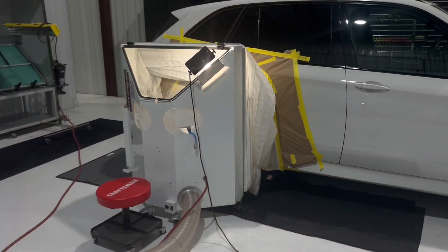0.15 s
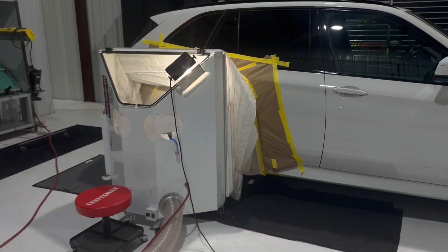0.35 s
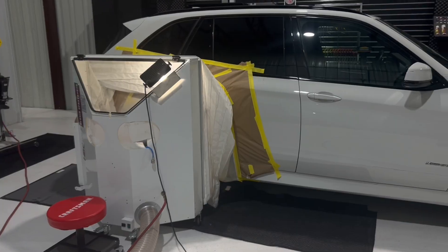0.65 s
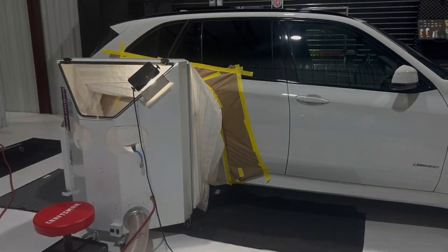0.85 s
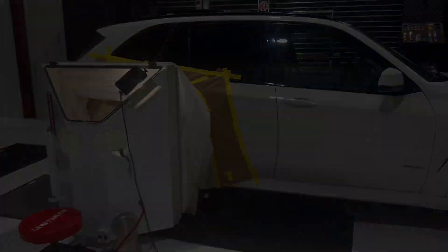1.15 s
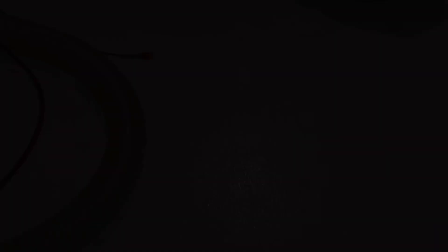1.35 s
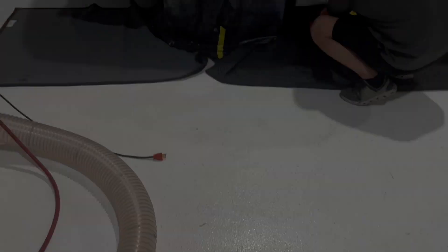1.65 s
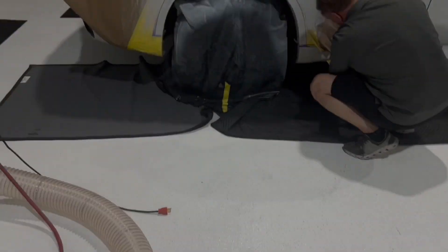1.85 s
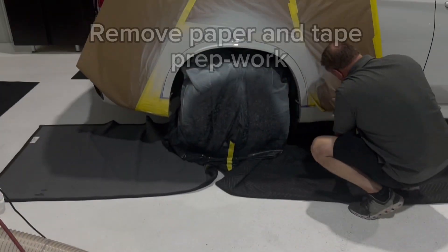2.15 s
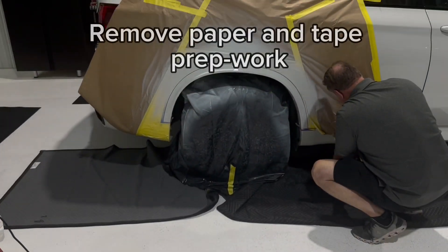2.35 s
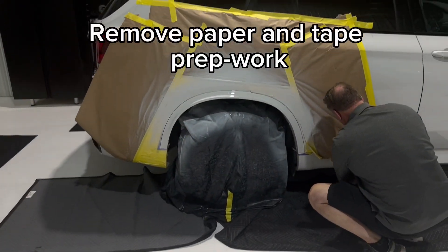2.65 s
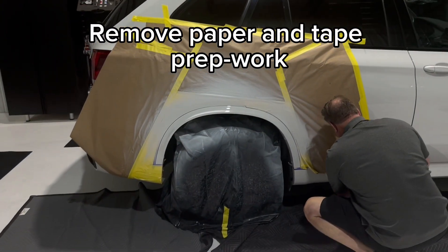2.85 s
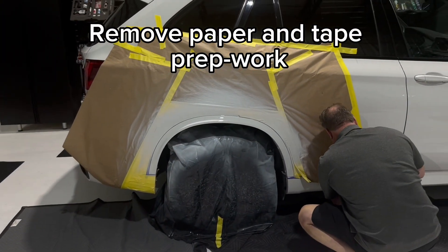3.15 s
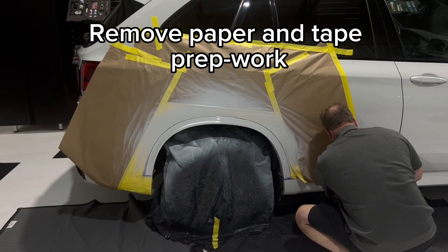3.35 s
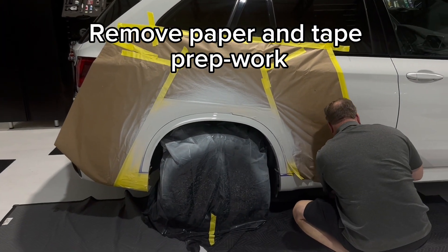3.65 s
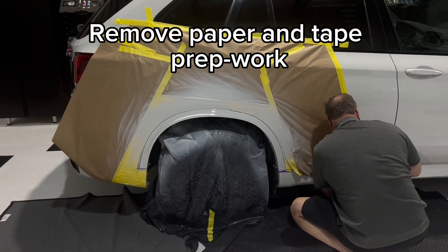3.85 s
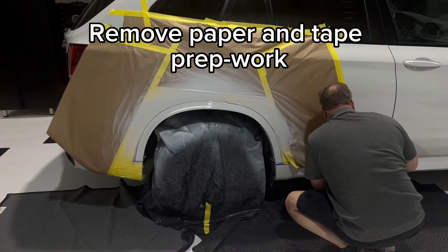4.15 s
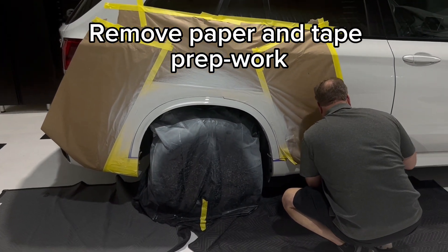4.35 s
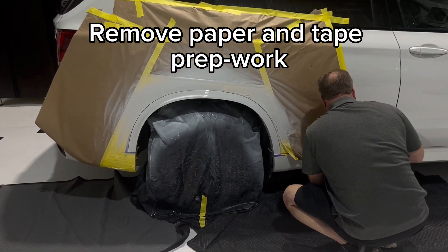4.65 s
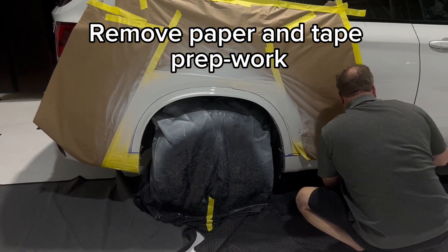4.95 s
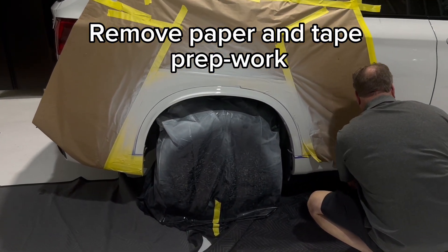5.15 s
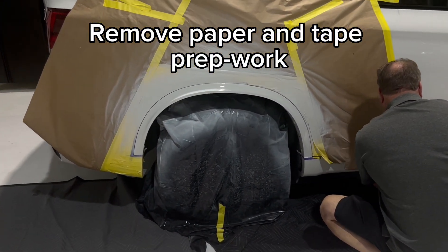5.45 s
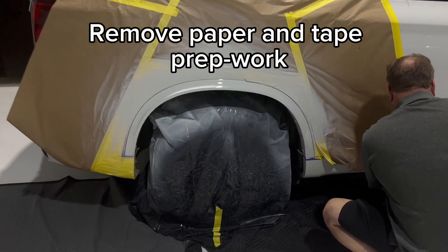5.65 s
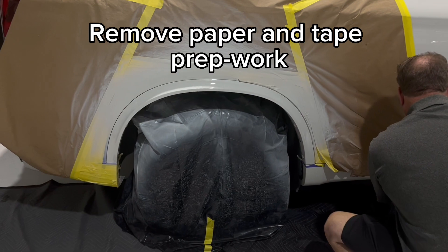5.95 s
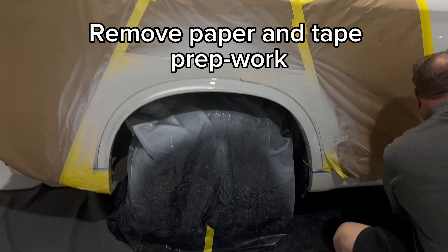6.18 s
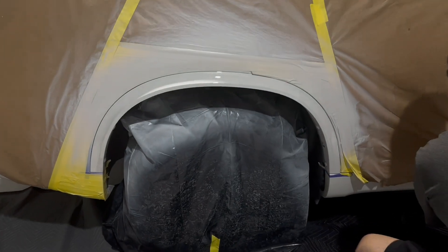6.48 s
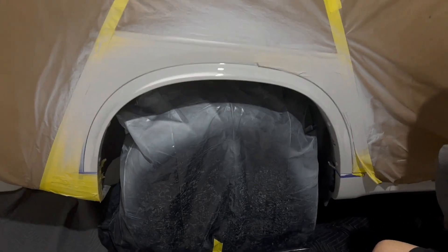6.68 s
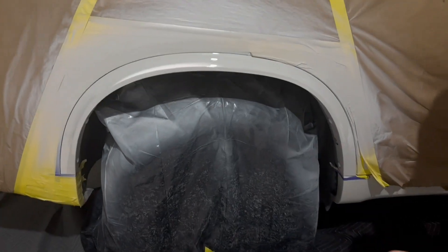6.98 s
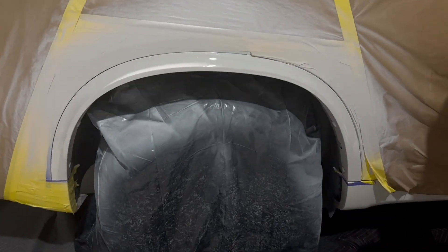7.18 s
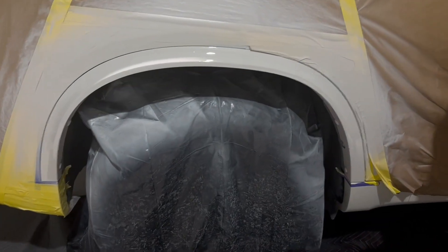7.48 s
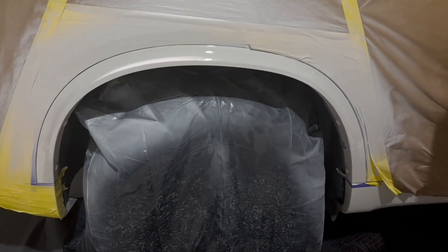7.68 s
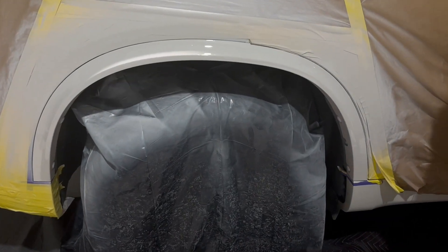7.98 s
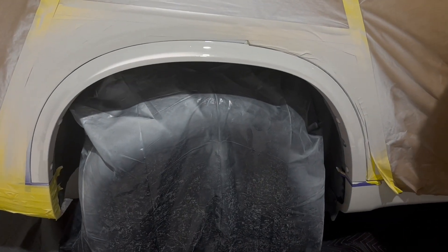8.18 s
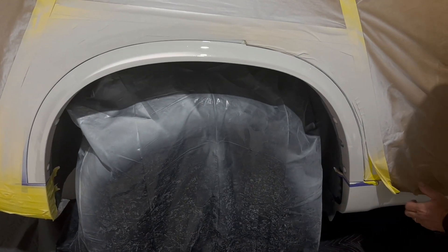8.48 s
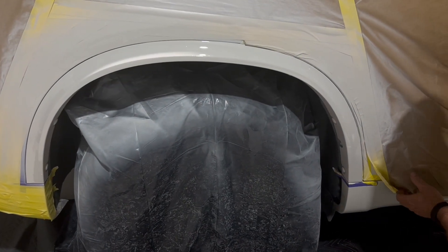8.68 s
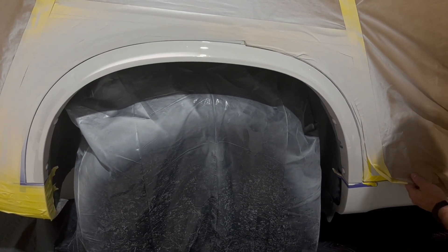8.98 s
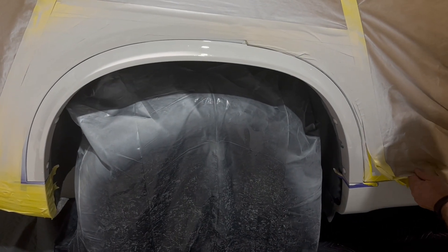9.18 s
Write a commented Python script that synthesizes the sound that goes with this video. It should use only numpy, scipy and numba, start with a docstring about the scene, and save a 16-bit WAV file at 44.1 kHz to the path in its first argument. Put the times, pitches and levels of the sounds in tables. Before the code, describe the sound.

Steady low fan drone with rushing air cuts out abruptly; dry paper crinkles in irregular surges, sharp snaps and flaps over faint ventilation rumble.

```python
"""A blower hums in a car workshop and stops dead; only then are paper, hall and ventilation heard.
Masking paper and tape are pulled off a car: creases buckle in swarms of tiny clicks and taut folds snap.
The sheet flaps as filtered noise bursts, rumples in soft knocks and slides as noise in a moving resonance.
The hard hall rings on as decaying noise after each crackle, above a low ventilation rumble."""
import sys
import numpy as np
from scipy import signal
from scipy.fft import rfft, irfft, next_fast_len
from scipy.io import wavfile
from scipy.ndimage import uniform_filter1d, map_coordinates
from numba import njit

SR = 44100
rng = np.random.default_rng(int(sys.argv[2]) if len(sys.argv) > 2 else 0)


def pcm_store(signal):
    """Save signal as 16-bit PCM."""
    levels = np.round(np.clip(np.atleast_2d(signal), -1, 1) * 32767)
    wavfile.write(sys.argv[1], SR, levels.astype(np.int16).T)


N = 411012
TIME = np.arange(N) / SR  # seconds
BLOWER_OFF_S = 1.333
PORTS_M = 0.26  # effective distance between the two microphones
SIDEWAYS_LAG_S = 0.0005  # sound from the left reaches the right microphone this much later

# a pull builds up over a share of its length, holds, then dies away
PULL_ATTACK_SHARE, PULL_RELEASE_S = 0.4, 0.04
# pulls on the paper, levels before the layer's gain: [start_s, length_s, crinkle_level_db, brightness_db]
PULLS = [(1.45, 0.098, -47, -5.5), (1.93, 0.07, -44, -4), (2.0, 0.12, -46, 5), (2.61, 0.04, -48, 17),
         (2.725, 0.037, -41, 14), (2.8, 0.11, -49, 11), (3.1, 0.27, -53, 6), (3.6, 0.033, -42, -4),
         (3.66, .11, -41, 6), (3.77, 0.21, -31, 5.5), (3.97, 0.14, -35, 8), (4.272, 0.041, -29, 6.5),
         (4.32, 0.099, -38, 6), (4.42, 0.058, -26, 9.5), (4.5, 0.13, -44.5, 0), (5.2, 0.049, -50, 6),
         (5.3, 0.1, -50, 5), (5.42, 0.077, -44, 14), (5.775, 0.031, -52.5, -20), (5.96, 0.029, -47, -7),
         (6.32, 0.036, -40.5, 4), (6.62, 0.041, -35, 10), (6.71, .11, -43.5, 7.5), (6.89, 0.05, -43, 2.5),
         (7.56, 0.18, -51.5, 5), (8.285, 0.023, -51, 8), (8.725, 0.061, -37, 14), (8.8, 0.091, -34.5, -1.5),
         (8.96, 0.048, -31, -0.5), (9.12, 0.09, -44, -19), (9.205, 0.042, -30, 5.5), (9.295, 0.025, -30, 9)]
# light handling of the paper between the pulls, levels before the layer's gain: [time_s, crinkle_level_db]
HANDLING = [(1.43, -59), (1.47, -64), (1.87, -63), (2.2, -54), (2.34, -64), (2.48, -63), (2.6, -45),
            (3.05, -56), (3.4, -59), (4.7, -53), (4.93, -62), (5.08, -59), (5.7, -59.5), (6.5, -58),
            (7.12, -63), (7.4, -56.5), (7.9, -62.5), (8.65, -80), (9.1, -56.5)]
# relative spectrum of a snapping crease or fold: [frequency_hz, level_db_per_hz]
SNAP_SPECTRUM = [(200, -9.5), (550, -9.5), (850, -3), (1300, -2.5), (2100, 0), (3200, -1.5), (4600, -4),
                 (6000, -3), (7200, -5), (9000, -5), (12000, -13), (16000, -18.5)]


def crinkle(gain_db=1.15, rate=150, rate_slope=0.7, crease_s=0.0021, rub_db=-10, thin_hz=850,
            body_from_db=-44, spread=0.8, facet_db=9, facet_hz=600, handling_bright_db=1.0):
    """Small creases buckle at random, more often the harder the pull, over the hiss of paper rubbing on paper."""
    # relative spectrum of crinkling paper: [frequency_hz, level_db_per_hz]
    crinkle_spectrum = [(200, -8), (550, -9), (950, 0.5), (1300, -6), (1950, -1.5), (2500, -2.5),
                        (2900, -2), (3250, -0.5), (3550, -3), (3950, -6.5), (4500, -7.5), (5000, -9),
                        (6000, -9), (7000, -7.5), (9000, -9.5), (11000, -17), (13000, -19.5), (16000, -23)]
    pull_db, bright_db = strokes(PULLS, PULL_ATTACK_SHARE, PULL_RELEASE_S, curve(HANDLING), handling_bright_db)
    # the rate setting, in creases per second, holds for a pull of -46 dB
    per_second = rate * undb(rate_slope * (np.clip(pull_db, -60, -28) + 46))
    starts = np.flatnonzero(rng.random(N) < per_second / SR)
    # each crease takes between half and double the typical time
    lengths_s = crease_s * 2 ** (2 * rng.random(len(starts)) - 1)
    # denser creases are each smaller, so that the pull alone sets the level
    sizes = 1 / np.sqrt(per_second[starts])
    cracks = buckle(lengths_s, spread, facet_db, facet_hz, size=640)
    swarm = np.zeros((2, N))
    for i, size, crack in zip(starts, sizes, cracks):
        add(swarm, i / SR, size * crack)
    rub = undb(rub_db) * diffuse()
    paper = flex(colour(unit(swarm) + rub, crinkle_spectrum))
    # a light touch only crackles; a hard pull also moves the body of the sheet
    thin = signal.sosfilt(signal.butter(2, thin_hz, "high", fs=SR, output="sos"), paper)
    paper = np.where(pull_db > body_from_db, paper, thin)
    return tilt(paper, bright_db) * undb(pull_db + gain_db)


def stray_ticks(rate=11, above_db=4, scatter_db=3.0, top_db=-27, crease_s=0.00089, spread=0.96,
                facet_db=7, facet_hz=500):
    """Now and then, at an even average rate per second, a stiffer crease stands out of the crinkle."""
    pull_db, _ = strokes(PULLS, PULL_ATTACK_SHARE, PULL_RELEASE_S, curve(HANDLING), 0)
    starts = np.flatnonzero(rng.random(N) < rate / SR)
    length, strength = rng.random((len(starts), 2)).T
    # mostly weak ticks with a few strong ones
    extra_db = scatter_db * np.minimum(-np.log(strength), 2)
    levels_db = np.minimum(pull_db[starts] + above_db + extra_db, top_db)
    cracks = buckle(crease_s * 2 ** (2 * length - 1), spread, facet_db, facet_hz, size=1024)
    out = np.zeros((2, N))
    for i, db, crack in zip(starts, levels_db, cracks):
        add(out, i / SR, undb(db) * crack)
    return colour(out, SNAP_SPECTRUM)


def snaps(gain_db=-10.0, spread=0.94, facet_db=4, facet_hz=400, full_hall_s=0.0016):
    """Taut folds and tape edges let go with loud cracks; returned as heard directly and as sent to the hall."""
    # folds that snap, levels before gain and colouring, treble against mids, time setting of the buckling:
    # [time_s, level_db, brightness_db, length_s]
    snap_table = [(1.454, -26, -1.5, 0.002), (1.489, -28, 6, 0.001), (1.787, -37, 3, 0.0015),
                  (1.939, -32.5, 8, 0.004), (1.955, -26, 5, 0.0024), (2.097, -29, -9, 0.001),
                  (2.195, -31, -1, 0.0013), (2.229, -35, -7, 0.00096), (2.301, -37, -18, 0.0014),
                  (2.376, -35.5, 5.5, 0.0032), (2.415, -30.5, 4, 0.00095), (2.512, -35.5, -3, 0.0015),
                  (2.553, -28.5, -1, 0.0013), (2.57, -29, 7, 0.001), (2.705, -22.5, -2, 0.0033),
                  (2.736, -25, 7, 0.0038), (2.757, -24, 8, 0.0018), (2.838, -23, -2, 0.0017),
                  (2.865, -32, -14, 0.0011), (2.923, -29, -6, 0.0036), (3.109, -25.5, 1, 0.0019),
                  (3.217, -30, -1, 0.0014), (3.249, -31.5, -4, 0.0016), (3.3515, -24.5, -5, 0.0015),
                  (3.417, -29, 4, 0.00098), (3.523, -34, -1.5, 0.0092), (3.683, -27, 0.5, 0.0032),
                  (3.745, -19.5, -5, 0.0064), (3.807, -16, -11, 0.0031), (4.106, -40, -7, .0015),
                  (4.135, -19.5, -2, 0.0016), (4.224, -26, -1, 0.0037), (4.262, -23.5, -7, 0.0027),
                  (4.279, -20, 2, 0.013), (4.43, -16, 8, 0.0018), (4.482, -23, 8, .002),
                  (4.978, -35.5, 0, 0.0024), (5.07, -37.5, -13.5, 0.0029), (5.53, -32.5, -12, 0.0018),
                  (5.64, -41, -20, 0.0084), (5.71, -43, -26, 0.0024), (5.792, -37, -24, 0.003),
                  (5.865, -41, 0, .001), (5.958, -36, 9, 0.00095), (5.985, -27, 3, 0.0014),
                  (5.995, -22.5, 6.5, 0.0016), (6.004, -26.5, 7, 0.00091), (6.068, -40.5, -15, 0.0041),
                  (6.146, -37, -6, .003), (6.169, -29, -5, 0.00089), (6.2257, -23, 17.5, 0.00075),
                  (6.297, -28.5, -18.5, 0.0016), (6.324, -12, 0.5, 0.002), (6.33, -17.5, 15, 0.0013),
                  (6.3716, -21, 21, 0.00066), (6.379, -19.5, 22, 0.00044), (6.403, -28, 18, 0.00042),
                  (6.498, -32, 20.5, 0.00065), (6.5192, -22, 8.5, 0.00099), (6.6127, -21, 0, 0.0019),
                  (6.6172, -5, 11, 0.0011), (6.629, -15, 8, 0.0032), (6.733, -22, 14, .0018),
                  (6.776, -31, -10, 0.00089), (6.824, -24, 9.5, 0.001), (7.0276, -20, 12.5, 0.00063),
                  (7.211, -32, -23, 0.00077), (7.275, -18.5, 2, 0.001), (7.358, -29, -2, 0.0017),
                  (7.459, -37, -7, 0.0017), (7.502, -30.5, -4, 0.0015), (7.6208, -24.5, 3, 0.0019),
                  (7.746, -25.5, -3, 0.00077), (7.776, -38, 4, .002), (7.816, -41, -11, 0.0014),
                  (7.829, -38, -12.5, 0.0009), (7.931, -42, -7, 0.0009), (8.045, -40.5, 6, .0014),
                  (8.126, -40, 12, 0.00055), (8.205, -38, -8, 0.00097), (8.213, -31.5, -8, 0.00091),
                  (8.716, -25.5, 1, .0011), (8.749, -32, 10, 0.0011), (8.761, -25, -1, 0.0014),
                  (8.82, -18.5, 8, 0.0051), (8.837, -22.5, -1, 0.0061), (8.867, -13.5, 10, 0.00049),
                  (8.886, -24, 17, 0.0011), (8.892, -14, 12, 0.00055), (8.927, -18.5, -3, 0.0054),
                  (8.938, -19, -3, 0.00064), (8.95, -15, 6, 0.00036), (8.9755, -12, 17, 0.0005),
                  (8.9835, -5, 12, 0.00067), (8.999, -13, -4, 0.0011), (9.037, -14, 2, 0.00041),
                  (9.051, -31, 6, 0.00039), (9.094, -17, 6, .001), (9.119, -22, 3, 0.00039),
                  (9.135, -16, -6, 0.00088), (9.1575, -12, 6, 0.00053), (9.175, -22, 9, .001),
                  (9.216, -16, 2, 0.002), (9.229, -10.5, 6, 0.0007), (9.305, -11.5, 12, 0.00077),
                  (9.31, -8, -2, 0.0029)]
    out, sent = np.zeros((2, 2, N))
    cracks = buckle(np.array(snap_table)[:, 3], spread, facet_db, facet_hz, size=2048)
    for (s, db, bright_db, length), crack in zip(snap_table, cracks):
        crack = tilt(crack, bright_db) * undb(db + gain_db)
        start = s - 0.001  # the clicks begin 1 ms into each crack
        add(out, start, crack)
        # the briefest ticks stay nearly dry
        add(sent, start, crack * min(length / full_hall_s, 1))
    return colour(out, SNAP_SPECTRUM), colour(sent, SNAP_SPECTRUM)


def flaps(gain_db=-1, swell_s=0.0086, width=0.42, spread=0.46):
    """A loose stretch of paper pops over like a slack drum skin: a short noise burst in one band."""
    # flaps of the loose sheet, higher where it is taut, peaks before gain: [time_s, peak_db, pitch_hz]
    flap_table = [(1.925, -23.5, 405), (2.072, -29.5, 1870), (2.192, -31, 1940), (2.62, -29.5, 2100),
                  (3.024, -42.5, 287), (3.042, -40.5, 190.7), (3.308, -44.5, 402), (3.349, -31, 2200),
                  (3.52, -30.5, 475.7), (3.559, -28.5, 198), (3.616, -27.5, 255.6), (3.746, -27, 348),
                  (3.806, -26.5, 1130), (3.843, -31, 369.2), (4.004, -28.5, 350), (4.032, -24.5, 334),
                  (4.066, -27.5, 393), (4.422, -24.5, 921), (4.52, -35, 393), (5.372, -34, 435.3),
                  (5.443, -29, 504), (6.408, -35.5, 189), (6.614, -25, 605.3), (7.222, -35.5, 420),
                  (7.658, -35.5, 500), (8.02, -45, 619), (8.095, -38.5, 557), (8.725, -29.5, 420),
                  (8.981, -27.5, 274), (9.213, -27, 239)]
    out, t = np.zeros((2, N)), TIME[:SR // 5]
    for s, db, hz in flap_table:
        push = rng.standard_normal((2, len(t))) * np.sqrt(t) * np.exp(-t / swell_s)
        band = signal.butter(2, [hz / (1 + width), hz * (1 + width)], "band", fs=SR)
        mid, side = signal.lfilter(*band, push)
        flap = np.array([mid + spread * side, mid - spread * side])
        add(out, s, flap * undb(db + gain_db) / np.abs(mid).max())
    return out


def slide(width=0.56, catch_db=5.0, broad_db=-10, wander=0.11, rest_db=-72, slack_hz=400):
    """The broad sheet drags over the panel, catching and letting go; its tension sets a hollow resonance."""
    attack_share, release_s = 0.22, 0.0315
    # slides over the panel with the typical pitch of the resonance: [start_s, length_s, level_db, pitch_hz]
    slide_table = [(1.5, 0.085, -51, 245), (2.02, 0.07, -47, 1930), (2.67, 0.084, -43.5, 2160),
                   (3.12, 0.06, -51, 340), (3.6, 0.02, -41, 1710), (3.68, 0.18, -46, 394),
                   (3.88, 0.072, -36, 2140), (4.01, 0.091, -47, 393), (4.44, .09, -47, 895),
                   (4.68, 0.077, -45.5, 870), (4.81, 0.083, -47.5, 2090), (5.19, 0.094, -44, 476),
                   (5.315, 0.06, -40.5, 474), (5.4, 0.065, -41.5, 533), (5.535, 0.017, -49, 480),
                   (6.31, 0.062, -50.5, 280), (6.63, 0.068, -50.5, 323.7), (7.19, 0.025, -49.5, 812),
                   (7.52, 0.26, -55.5, 538), (7.88, 0.26, -58, 660), (8.01, .03, -58, 750),
                   (8.08, 0.034, -59, 792), (8.29, .05, -53, 597), (8.365, 0.036, -51, 662),
                   (8.42, 0.13, -57.5, 680)]
    # relative spectrum of the whole sheet: [frequency_hz, level_db_per_hz]
    sheet_spectrum = [(70, -55), (150, 14), (260, 6), (430, -2), (650, 11), (1000, 8), (1800, -7),
                      (4000, -71)]
    level_db, pitch = strokes(slide_table, attack_share, release_s, rest_db, slack_hz)
    drag = diffuse() * undb(catch_db * np.tanh(walk(70)))
    hz = pitch * np.exp(wander * np.tanh(walk(25)))
    # two resonances in a row, for each channel
    hollow = np.array([resonance(resonance(channel, hz, width), hz, width) for channel in drag])
    # the whole sheet joins in fully only while it is slack
    slackness = np.minimum(slack_hz / pitch, 1)
    broad = undb(broad_db) * unit(colour(drag, sheet_spectrum)) * slackness
    return (unit(hollow / np.sqrt(hz)) + broad) * undb(level_db)


def rumple(rate=150, scatter_db=3.5, octaves=0.664, cycles=1.9, rest_db=-85, rest_hz=300):
    """As the sheet is gathered, broad facets pop over in a dense run of soft knocks, each at its own pitch."""
    attack_share, release_s = 0.16, 0.023
    # the sheet is gathered up, with the typical pitch of its knocks: [start_s, length_s, level_db, pitch_hz]
    rumple_table = [(3.56, .11, -42.5, 179), (3.68, 0.13, -44.5, 383), (3.9, 0.071, -40, 242),
                    (4.01, 0.091, -42.5, 209), (4.27, 0.079, -47, 257), (4.44, 0.083, -47, 330),
                    (5.22, 0.25, -51.5, 336), (5.46, .04, -44.5, 150), (6.9, 0.055, -47, 483),
                    (6.93, 0.036, -48, 189.6), (8.3, 0.03, -55, 268.9), (8.78, .24, -55, 256),
                    (9.2, 0.12, -47.5, 255)]
    level_db, pitch = strokes(rumple_table, attack_share, release_s, rest_db, rest_hz)
    starts = np.flatnonzero(rng.random(N) < rate / SR)  # rate is in knocks per second
    out, t = np.zeros((2, N)), TIME[:SR // 20]
    for i, (tune, strength, left, right) in zip(starts, rng.standard_normal((len(starts), 4))):
        hz = pitch[i] * 2 ** (octaves * tune)
        age = 2 * hz * t / cycles
        phase = 0.5 * np.array([[left], [right]])  # differs between the ears
        knock = age * np.exp(-age) * np.sin(2 * np.pi * hz * t + phase)
        add(out, i / SR, knock * np.sqrt(pitch[i]) * undb(scatter_db * np.tanh(strength)))
    return unit(out) * undb(level_db)


def tape_ring(x):
    """A stretched strip of tape lends its own resonances to the pulls that lift it."""
    # a strip of tape is lifted: [from_s, to_s]
    tape_lifts = [(6.6, 6.68), (8.69, 9.4)]
    # relative resonances of the stretched tape: [frequency_hz, level_db]
    tape_spectrum = [(300, -2), (500, 0.5), (950, -2), (1250, 2), (1700, 2.5), (2200, -2), (2850, -1.5),
                     (3250, 0), (3570, 5), (4000, -0.5), (4800, 3.5), (5250, -2), (5650, 3.5), (5930, 2),
                     (6120, 3), (6350, 2), (7500, -2), (11000, 3.5), (16000, 0)]
    on_tape = sum((TIME > start) & (TIME < end) for start, end in tape_lifts)
    return x * (1 - on_tape) + colour(x * on_tape, tape_spectrum)


def blower(drift=0.0033, flutter_db=0.65, left_treble_db=3.5, shadow_hz=400, blade_db=-3.0, direct_db=-4):
    """An unbalanced fan hums over turbulent air, partly straight from the left; its blade tone surges."""
    blade_hz, air_level_db = 239, -28.5
    # blower tones, typical level and size of its waver: [pitch_hz, level_db_rms, waver_db]
    hum_table = [(53.8, -40, 0), (79.2, -33.5, 1.5), (159.2, -43, 0), (492, -48, -2)]
    # surging blade tone, levels before blade_db: [time_s, level_db]
    blade_table = [(0, -32), (.35, -29.5), (.42, -25), (.53, -35.5), (.78, -27.5), (.86, -31.5),
                   (1.1, -31.5), (1.16, -29), (1.28, -24), (1.33, -27)]
    # relative spectrum of rushing air: [frequency_hz, level_db_per_hz]
    air_spectrum = [(22, -38), (38, -9), (53, -3.5), (68, -10.5), (110, -6.5), (140, -10), (195, -10.5),
                    (225, -2), (275, -5.5), (305, -15.5), (430, -19.5), (550, -19), (900, -25), (2200, -30),
                    (4000, -39.5), (8000, -36), (9100, -36), (10300, -61), (11500, -59.5), (16000, -73)]
    clock = np.cumsum(1 + drift * walk(8.1)) / SR  # the speed drifts a little
    hum = sum(undb(db + waver_db * walk(13.0)) * tone(hz, clock) for hz, db, waver_db in hum_table)
    hum = hum + undb(curve(blade_table) + blade_db) * tone(blade_hz, clock)
    jet = rng.standard_normal(N)
    from_left = np.array([jet, np.roll(jet, int(SIDEWAYS_LAG_S * SR))])
    rush = diffuse() + undb(direct_db) * from_left
    air = unit(colour(rush, air_spectrum)) * undb(air_level_db + flutter_db * walk(22.7))
    # the bass bends round the microphones, the hiss is louder on the blower's side
    bass = lowpass(air, shadow_hz)
    return hum + bass + (air - bass) * undb([[left_treble_db / 2], [-left_treble_db / 2]])


def hall(x, wet_db=-8.0, early_db=-9, early_s=0.016, gap_s=0.00352):
    """Quick reflections off floor and car body, then the long tail of the hall, both as decaying noise."""
    # reverberation, time to die away by 60 dB: [frequency_hz, decay_s]
    decay_table = [(100, 1.3), (500, 0.62), (2000, 0.66), (5000, 0.88), (10000, 0.57), (16000, 0.14)]
    size = 2 ** 16
    t, noise = TIME[:size], rfft(diffuse(size))
    # every octave band of the tail dies away at its own pace
    octave = np.round(np.log2(np.maximum(np.fft.rfftfreq(size, 1 / SR), 64)))
    tail = np.zeros((2, size))
    for k in np.unique(octave):
        tail += irfft(noise * (octave == k)) * undb(-60 * t / on_log_hz(decay_table, 2 ** k))
    early = diffuse(size) * np.exp(-t / early_s)
    late_part = undb(wet_db) * unit(tail * (t > 2 * gap_s))
    early_part = undb(early_db) * unit(early * (t > gap_s))
    response = (late_part + early_part) / np.sqrt(size)
    return signal.fftconvolve(x, response, axes=-1)[:, :N]


def mic_pair(x, gain_db=0.75):
    """The microphone pair narrows the sound and shifts left against right, differently in each band."""
    # phase by which left leads, and level of the side signal: [frequency_hz, lead_radians, side_db]
    pair_table = np.array([(150, 0.7, 0), (350, -0.54, -2.5), (660, -1.6, -0.5), (1100, -1.5, -3),
                           (1470, -1.1, -7.5), (1850, -0.5, -19), (2220, 0.2, -2.5), (2780, -2, -4.5),
                           (3450, -1.7, -7.5), (4150, -0.65, -0.5), (5100, -2.13, -1), (5950, -.95, -5.5),
                           (7500, -0.97, -1.5), (15000, -1.5, -7)])
    size = next_fast_len(N + SR // 10, True)
    hz = np.fft.rfftfreq(size, 1 / SR)
    turn = np.exp(0.5j * on_log_hz(pair_table[:, :2], hz))  # half the lead for each channel
    left, right = rfft(x, size)
    mid = (left + right) / 2
    side = (left - right) / 2 * undb(on_log_hz(pair_table[:, ::2], hz))
    pair = irfft(np.array([(mid + side) * turn, (mid - side) / turn]), size)
    return pair[:, :N] * undb(gain_db)


def ventilation(gain_db=-3, hum_hz=59.7, hum_db=-7.5, waver_db=1.5, drift=0.021):
    """A distant fan: a wavering hum in a narrow rumble, with faint hiss above it."""
    # relative spectrum of the hall background: [frequency_hz, level_db_per_hz]
    rumble_spectrum = [(22, -29.5), (42, -30), (57, -3.5), (75, -17), (130, -21.5), (300, -30.5),
                       (450, -45.5), (700, -44), (2000, -41.5), (5000, -46.5), (10000, -49.5), (12500, -80)]
    # overall ventilation level, before gain_db and hum_db set the two parts: [time_s, level_db]
    level_table = [(1.36, -51), (1.7, -50.5), (2.1, -42.5), (3.5, -43), (5.0, -43), (6.6, -42), (8.0, -44),
                   (8.55, -43.5), (8.8, -42), (9.32, -38.5)]
    clock = np.cumsum(1 + drift * walk(5.1)) / SR
    hum = tone(hum_hz, clock) * undb(hum_db + waver_db * walk(8.5))
    rumble = unit(colour(diffuse(), rumble_spectrum)) * undb(gain_db)
    return (rumble + hum) * undb(curve(level_table))


def strokes(table, attack_share, release_s, rest_db, rest_quality):
    """Level in dB of overlapping strokes, and their last column averaged so that the loudest stroke leads."""
    power = undb(rest_db) ** 2 + np.zeros(N)
    weighted = power * rest_quality
    age = TIME[:SR]
    for start, length, db, quality in table:
        attack = np.clip(age / (attack_share * length), 0, 1)
        release = np.exp(-np.clip((age - length) / release_s, 0, 20))
        stroke = (undb(db) * attack * release) ** 2
        add(power, start, stroke)
        add(weighted, start, stroke * quality)
    return 10 * np.log10(power), weighted / power


def buckle(lengths_s, spread, depth_db, width_hz, size, swell=0.27):
    """Creases give way, each in a short avalanche of clicks that starts 1 ms in; peak level near 1."""
    mid, side, grain = rng.standard_normal((len(lengths_s), 3, size)).transpose(1, 0, 2)
    # the burst is strongest one length after its start, at least 0.4 ms
    age = np.maximum(TIME[:size] - 0.001, 0) / np.maximum(lengths_s, 0.0004)[:, None]
    shape = (age * np.exp(1 - age)) ** swell
    stereo = np.stack([mid + spread * side, mid - spread * side], axis=1)
    clicks = unit(stereo * undb(6.1 * np.tanh(grain))[:, None])  # grain makes the noise spiky
    return facet(clicks * shape[:, None], depth_db, width_hz)


def facet(x, depth_db, width_hz):
    """Every facet of the crumpled sheet rings with its own random set of broad resonances."""
    place = np.fft.rfftfreq(x.shape[-1], 1 / SR) / width_hz
    k, part = place.astype(int), place % 1
    db = depth_db * np.tanh(rng.standard_normal((len(x), 1, 256)))
    # glide from one random gain to the next along the frequencies
    gain = undb(db[..., k] * (1 - part) + db[..., k + 1] * part)
    return irfft(rfft(x) * gain / np.sqrt(np.mean(gain ** 2, axis=-1, keepdims=True)))


def flex(x, depth_db=4.5, width_hz=330, hold_s=0.07):
    """As the sheet bends, its broad resonances come and go."""
    hz, t, spectra = signal.stft(x, SR, nperseg=512)
    place = np.meshgrid(hz / width_hz, t / hold_s, indexing="ij")
    # a smooth random landscape over frequency and time
    bends = map_coordinates(rng.standard_normal((128, 256)), place, order=1, mode="mirror")
    return signal.istft(spectra * unit(undb(depth_db * bends)), SR)[1][:, :N]


@njit
def resonance(x, hz, width):
    """State-variable band-pass with a moving centre; width is a share of the centre."""
    y, band, low = np.empty(len(x)), 0., 0.
    for i in range(len(x)):
        g = np.tan(np.pi * hz[i] / SR)
        v = (band + g * (x[i] - low)) / (1 + g * (g + width))
        band = 2 * v - band
        low = low + 2 * g * v
        y[i] = width * v
    return y


def tone(hz, clock):
    """A stereo tone of rms 1 from the left, so that it reaches the right microphone late."""
    ears = np.array([clock, clock - SIDEWAYS_LAG_S])
    return np.sqrt(2) * np.sin(2 * np.pi * (hz * ears + rng.random()))


def diffuse(size=N):
    """Stereo noise arriving from all directions: long waves reach both microphones alike."""
    fft_size = next_fast_len(size, True)
    # 343 m/s is the speed of sound
    alike = np.sinc(2 * np.fft.rfftfreq(fft_size, 1 / SR) * PORTS_M / 343) * 0.97
    noise = rng.standard_normal((2, 2 * len(alike))).view(complex)
    mid, side = irfft(noise * np.sqrt([1 + alike, 1 - alike]), fft_size)[:, :size]
    return unit(np.array([mid + side, mid - side]))


def walk(rate):
    """Random levels, rate of them per second, joined by straight glides; rms 1."""
    k = int(SR / rate)
    steps = np.repeat(rng.standard_normal(N // k + 1), k)
    return unit(uniform_filter1d(steps, k)[:N])


def colour(x, points):
    """Causal filter with the given spectrum; white noise keeps its power."""
    size = 16384
    gain = unit(undb(on_log_hz(points, np.fft.rfftfreq(size, 1 / SR))))
    # folding the cepstrum gives a minimum-phase response, which starts at once
    cepstrum = irfft(np.log(gain))
    cepstrum[1:size // 2] *= 2
    cepstrum[size // 2 + 1:] = 0
    response = irfft(np.exp(rfft(cepstrum)))[:size // 2]
    return signal.oaconvolve(x, response[None], axes=-1)[:, :x.shape[-1]]


def lowpass(x, hz):
    """Gentle one-pole low-pass."""
    g = np.tan(np.pi * min(hz, SR / 3) / SR)
    return signal.lfilter([g, g], [g + 1, g - 1], x)


def tilt(x, db, pivot_hz=4000):
    """Lift the treble by half of db and lower everything beneath it by the other half."""
    low = lowpass(x, pivot_hz)
    return low * undb(-db / 2) + (x - low) * undb(db / 2)


def undb(db):
    """Decibels to gain."""
    return np.exp(np.asarray(db) * (np.log(10) / 20))


def unit(x):
    """Scale to rms 1."""
    return x / np.sqrt(np.mean(x ** 2) + 1e-18)


def curve(table):
    """(time_s, value) points joined by straight lines in time."""
    return np.interp(TIME, *np.transpose(table))


def on_log_hz(points, hz):
    """Read (frequency_hz, value) points on a log-frequency axis."""
    f, value = np.transpose(points)
    return np.interp(np.log(hz + 1), np.log(f), value)


def add(track, s, sound):
    """Mix a sound in at time s, in seconds."""
    start = max(int(s * SR), 0)
    part = sound[..., :max(N - start, 0)]
    track[..., start:start + part.shape[-1]] += part


def scene(left_db=0.17):
    """First the blower alone, then the paper work, slightly off centre, over the ventilation."""
    paper = crinkle() + stray_ticks() + flaps() + slide() + rumple()
    cracks, cracks_sent = snaps()
    direct = tape_ring(paper + cracks)
    reverb = hall(tape_ring(paper + cracks_sent))
    heard = mic_pair(direct + reverb)
    work = heard * undb([[left_db], [-left_db]]) + ventilation()
    running = np.clip((BLOWER_OFF_S - TIME) * 1000, 0, 1)  # falls to 0 within 1 ms
    return running * blower() + (1 - running) * work


def record(dry):
    """The microphone loses the deepest bass and the very top."""
    top_hz = 15700
    dry = signal.sosfilt(signal.butter(2, 26, "high", fs=SR, output="sos"), dry)
    return signal.sosfilt(signal.ellip(8, 0.2, 70, top_hz, fs=SR, output="sos"), dry)


dry = scene()
out = record(dry)
pcm_store(out)
```